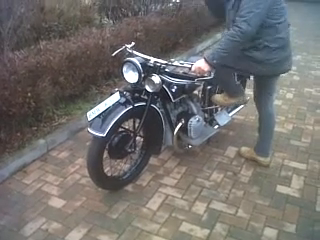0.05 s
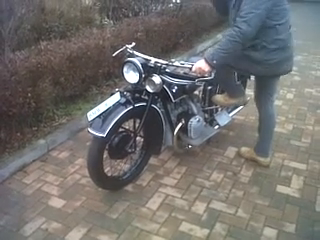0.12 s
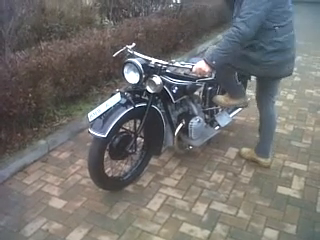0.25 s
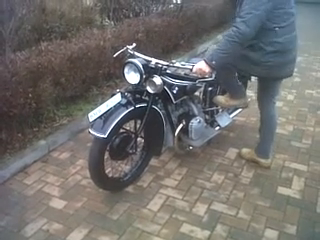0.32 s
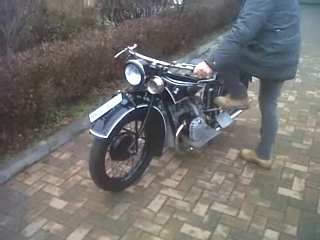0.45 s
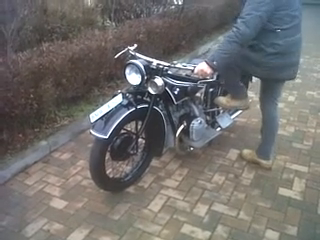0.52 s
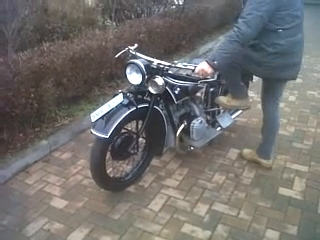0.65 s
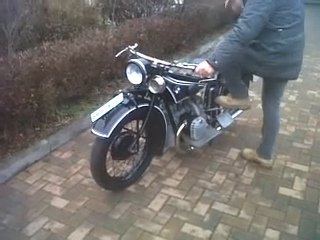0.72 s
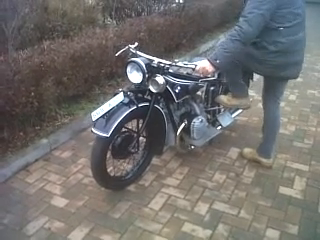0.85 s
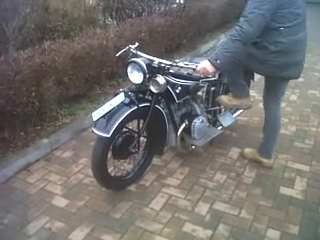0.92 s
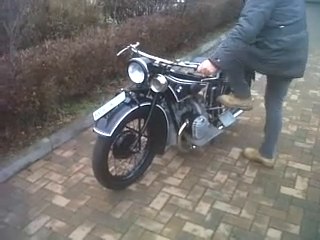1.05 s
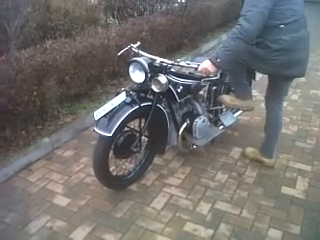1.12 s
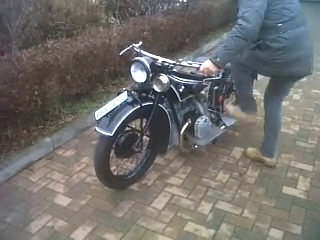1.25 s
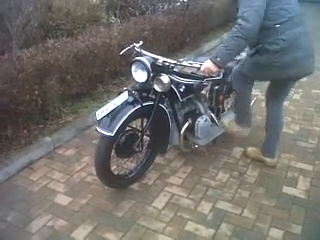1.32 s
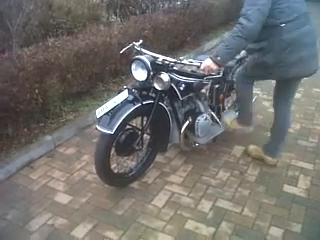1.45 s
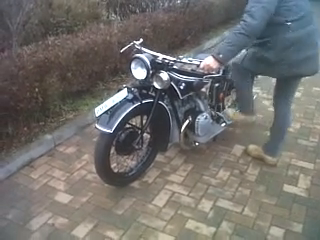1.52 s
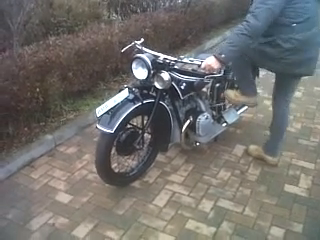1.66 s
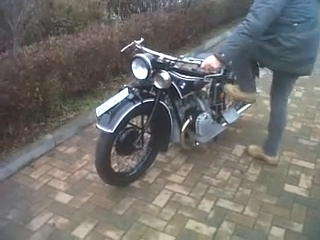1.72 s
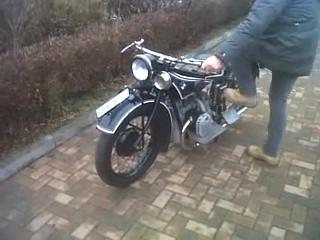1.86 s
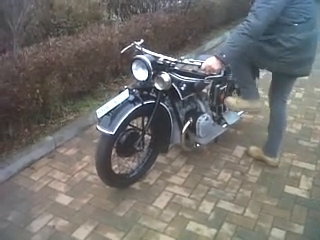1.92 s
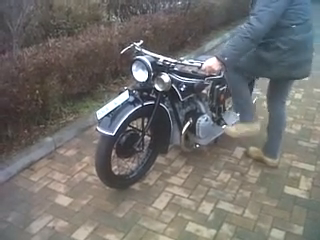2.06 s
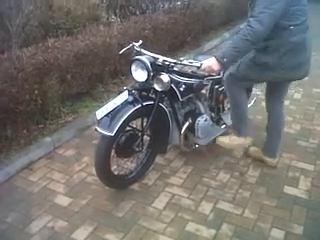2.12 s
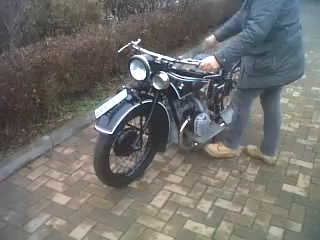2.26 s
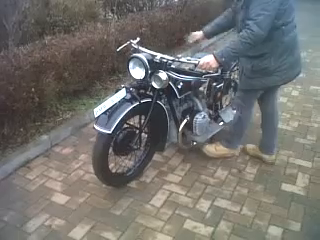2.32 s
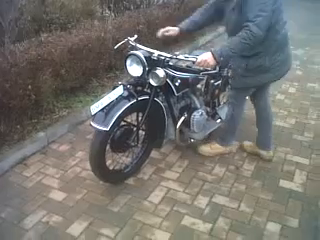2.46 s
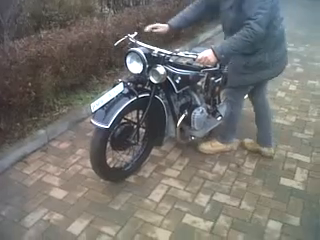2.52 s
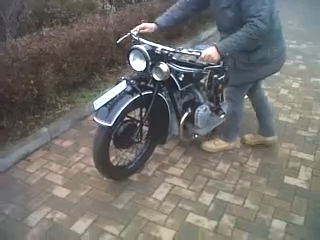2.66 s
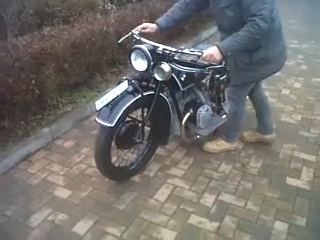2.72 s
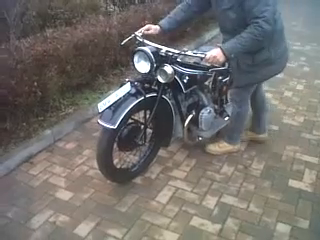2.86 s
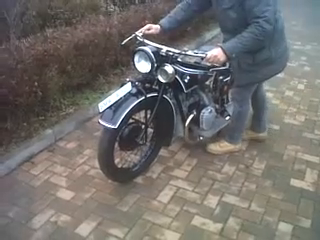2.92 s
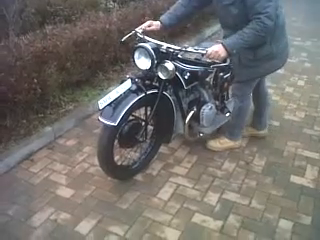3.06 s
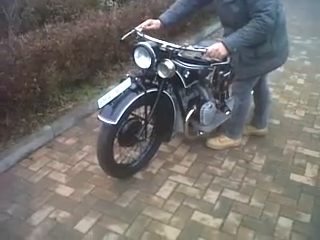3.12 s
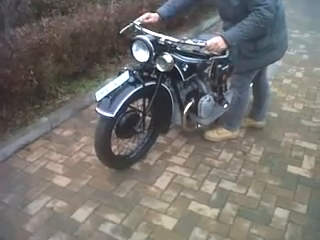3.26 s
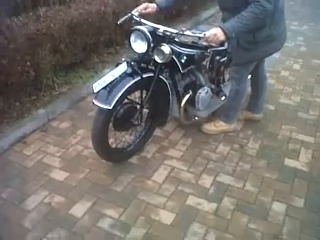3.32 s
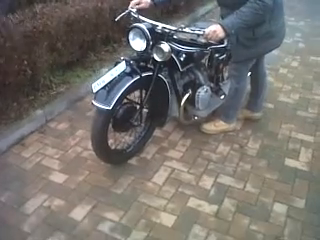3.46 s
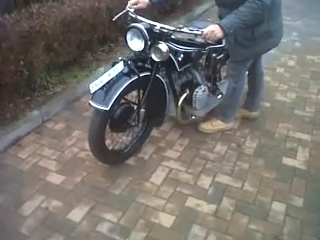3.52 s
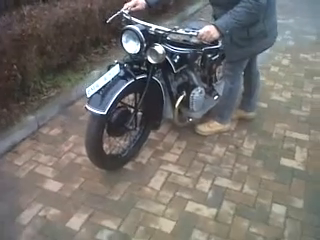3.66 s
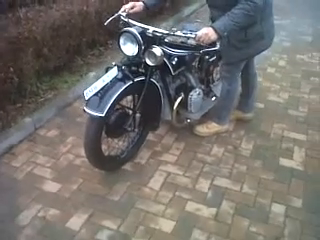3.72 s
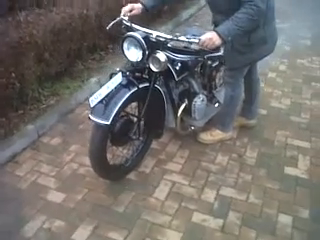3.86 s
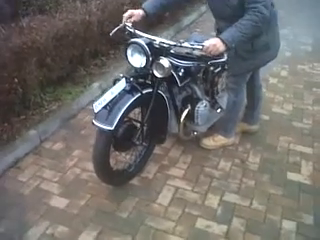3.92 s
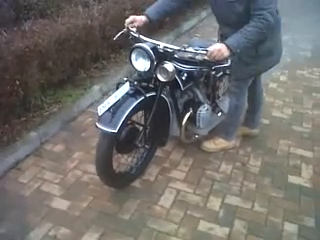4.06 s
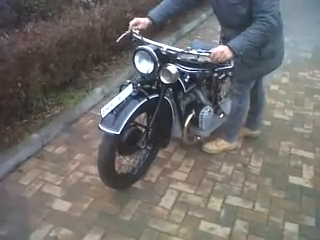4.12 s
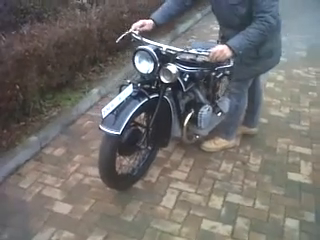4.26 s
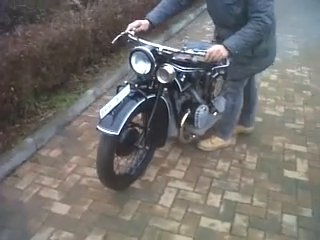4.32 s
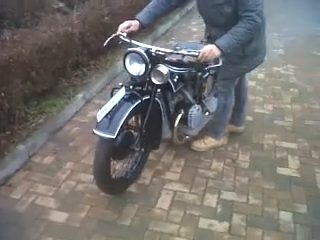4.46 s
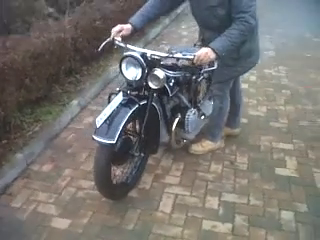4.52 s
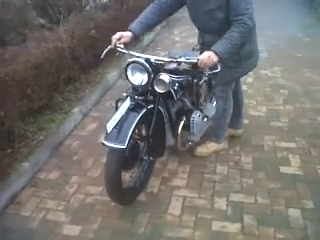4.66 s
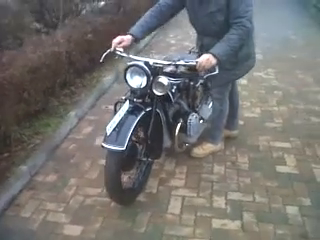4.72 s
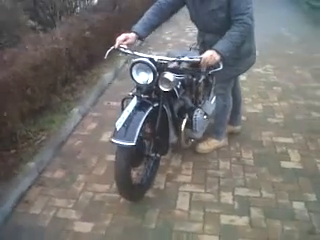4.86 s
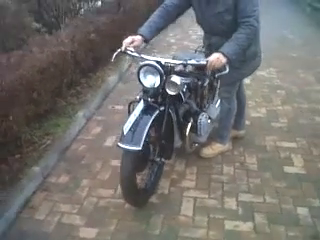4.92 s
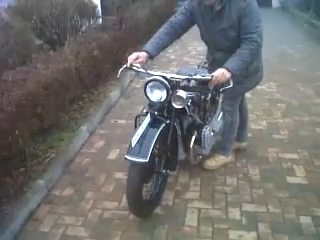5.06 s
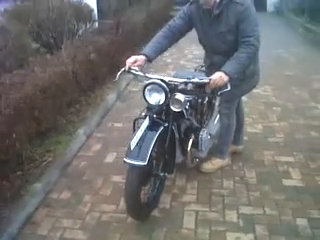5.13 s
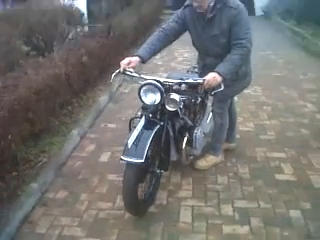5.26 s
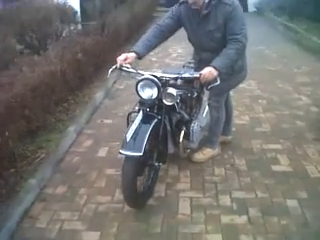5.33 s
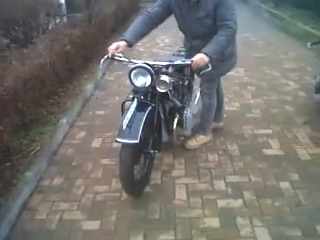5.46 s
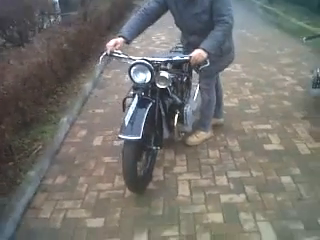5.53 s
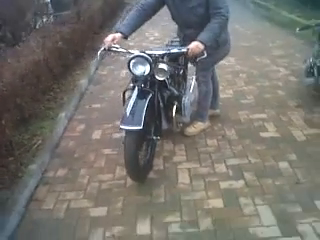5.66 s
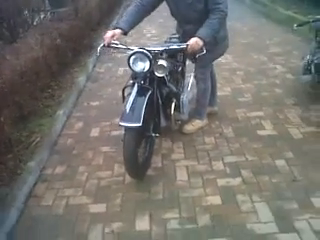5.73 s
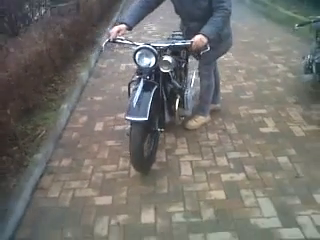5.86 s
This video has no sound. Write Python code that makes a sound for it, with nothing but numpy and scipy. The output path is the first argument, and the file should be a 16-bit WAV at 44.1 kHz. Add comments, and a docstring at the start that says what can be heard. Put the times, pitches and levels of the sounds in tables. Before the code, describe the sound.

Near-silence with faint far traffic on a paved drive, then a metallic kick-lever knock and a short ratchet whirr. An old two-cylinder motorcycle catches with slow, hollow chuffs and tappet clatter, gathers speed, then opens up into a loud, rough, rasping roar with skipped strokes. It eases slightly and keeps running fast and uneven, a little farther away. Close small microphone, thin bass, dull top, slight yard echoes.

```python
"""Paved drive: an old two-cylinder motorcycle is kick-started near a small microphone.
A ratchet whirrs, one cylinder catches, the other joins; the throttle opens once and the engine misses strokes.
Exhaust: a pressure pulse a turn with pipe echoes, silencer boom and gas noise. Gear: dense contacts and
valve knocks through case resonances. Intake: gulps of noise. Also short ringing knocks, a thin tone, a jingle.
Yard echoes follow all of it; far traffic and air lie under it."""
import sys
import numpy as np
from scipy import signal
from scipy.fft import rfft, irfft, next_fast_len
from scipy.io import wavfile
from scipy.ndimage import uniform_filter1d

SR = 44100
rng = np.random.default_rng(int(sys.argv[2]) if len(sys.argv) > 2 else 0)


def store_pcm(level_fs):
    """Save levels as 16-bit WAV."""
    pcm = np.round(np.clip(level_fs, -1, 1) * 32767).astype(np.int16)
    wavfile.write(sys.argv[1], SR, np.atleast_2d(pcm).T)


def boost_factor(decibels):
    """Convert a level in decibels to a linear amplitude factor."""
    exponent = np.asarray(decibels, float) / 20
    return 10 ** exponent


N = 259749
T = np.arange(N) / SR

# crank speed, one exhaust stroke a turn: (time [s], speed [turns/s])
CRANK_SPEED = [(1.48, 10.2), (1.79, 11.67), (2.124, 13.18), (2.44, 16.57), (2.67, 17.37), (2.91, 22.33),
               (3.235, 26.94), (3.41, 31.56), (3.688, 37.3), (3.82, 36.87), (4.01, 42.38), (4.18, 41.7),
               (4.442, 34.59), (4.56, 38.51), (4.792, 41.79), (4.986, 36.36), (5.221, 41.41), (5.34, 41.79),
               (5.52, 41.21), (5.66, 39.09), (5.79, 36.66), (5.89, 36.51)]
# regular firing: (first [s], last [s], spacing [turns], first level [dB], last level [dB])
STRONG_FIRINGS = [(1.486, 1.486, 2, -26.5, -26.5), (1.673, 2.163, 2, -28, -25.5),
                  (2.302, 2.774, 2, -22.5, -20), (2.87, 3.048, 2, -17, -17), (3.126, 3.533, 2, -13.5, -9.5),
                  (3.59, 3.807, 2, -13, -13), (3.862, 4.153, 2, -9.5, -10), (4.468, 4.774, 2, -12, -11.5),
                  (4.977, 5.475, 2, -13.5, -14.5), (5.571, 5.888, 4, -12.5, -12.5)]
WEAK_FIRINGS = [(2.235, 2.235, 4, -29.5, -29.5), (2.825, 3.086, 6, -25, -18), (3.311, 3.441, 4, -18, -19),
                (3.619, 3.673, 2, -18, -11), (3.835, 4.034, 4, -10.5, -12), (4.438, 4.75, 4, -13, -13),
                (5.005, 5.307, 4, -16, -12.5), (5.451, 5.451, 4, -12, -12), (5.648, 5.648, 4, -13, -13),
                (5.861, 5.861, 4, -17, -17)]
# pulse running to and fro in pipe and silencer:
# (delay when warm [ms], height when cold [ratio], height when warm [ratio], height after a miss [ratio])
PIPE_ECHOES = [(6.68, 1.47, 0.53, .15), (10.91, 0.79, 0.39, .05), (13.03, 0.66, .0, 0.25),
               (15.49, 0.32, 0.37, 0.0042), (20.22, 0.33, 0.25, 0.17), (25.6, .2, 0.16, 0.059)]
# silencer resonances: (frequency [Hz], width [Hz], level [dB])
SILENCER_MODES = [(118, 184, -10), (195.4, 17, 11.5), (240.6, 49, -5), (285, 26, -13.5), (684, 120, -15.5)]
# header pipe resonances: (frequency [Hz], width [Hz], level [dB])
HEADER_MODES = [(400, 97, -0.5), (667, 170, -2.5)]
# crankcase and cover resonances: (frequency [Hz], width [Hz], level [dB])
CASE_MODES = [(627, 136, 4), (967, 122, 12.5), (1135, 94, 9.5), (1287, 131, 4), (1644, 266, 4),
              (1823, 163, 2), (2210, 200, -10.5), (2554, 110, -8), (3885, 120, -21.5), (4400, 95, -23),
              (5410, 590, -29.5), (6360, 42, -38.5)]
# gear clatter spectrum: (frequency [Hz], density [dB per Hz])
CLATTER_SPECTRUM = [(210, -16), (350, 15.5), (560, 4), (819, -26), (1000, 8.5), (1210, -10.5), (1650, -24),
                    (2470, -24.5), (3030, -43), (5430, -50), (7270, -48.5), (9450, -96.5), (16000, -120)]
# intake roar spectrum: (frequency [Hz], density [dB per Hz])
INTAKE_SPECTRUM = [(710, -28.5), (1200, -15), (1300, 1.5), (1520, -10), (1710, 4), (1960, -2), (2210, -3),
                   (2590, -9.5), (3300, -12.5), (3830, -12), (4150, -15), (4430, -13.5), (4650, -19.5),
                   (5500, -25), (5900, -31), (7270, -53.5), (9450, -71.5), (16000, -120)]
# frame shudder spectrum: (frequency [Hz], density [dB per Hz])
FRAME_SPECTRUM = [(25, -9), (60, -9.5), (110, -3.5), (190, 8.5), (300, -4), (450, -29), (800, -55)]
# gear level laws: (full speed, throttle shut [dB], speed slope [dB/octave], added at open throttle [dB],
# added when every turn fires [dB], slope as the listener steps away [dB/s])
CLATTER_LAW = (-29.5, 9.5, 1, 1.5, -2.5)
INTAKE_LAW = (-48.5, 6, 17, 4, -1.9)
# valve gear over two turns: (turns after the strong stroke [turns], relative level [dB], tilt [dB/octave])
VALVE_HITS = [(.0, 3, 7), (.49, 5, 5), (.75, 2, -3.5), (1.33, 0, -2), (1.5, 8.5, 6), (1.57, 5, 1)]
# ratchet slipping as the lever swings down and back: (full from [s], to [s], level [dB], swell [dB/s])
RATCHET_SLIPS = [(1.423, 1.48, -51, 328), (1.501, 1.51, -38.5, 597), (1.655, 1.891, -34, 152)]
# ratchet resonances: (frequency [Hz], width [Hz], level [dB])
RATCHET_MODES = [(788, 158, -2.5), (947, 78, 7.5), (1030, 66, 7), (1143, 26, 9.5), (1590, 210, -5.5),
                 (1860, 100, -3.5), (2320, 1000, -24), (2900, 410, -17), (3640, 190, -21), (4470, 110, -28),
                 (5830, 190, -41)]
# knocks of lever, stop and loose parts: (time [s], relative level [dB], tilt [dB/octave])
LEVER_KNOCKS = [(1.411, -37, 0.5), (1.479, -26.5, -0.5), (1.503, -20.5, 2.5), (1.512, -27, 0.5)]
# short ringing knocks (lever thuds, valve clacks, loose parts, one faint early hoot):
# (time [s], relative level [dB], pitch [Hz], t60 [s])
RINGING_KNOCKS = [(0.634, -54, 470, 0.21), (1.44, -44, 1030, 0.074), (1.441, -38, 1790, 0.05),
                  (1.477, -22, 710, 0.063), (1.483, -25, 400, 0.1), (1.503, -29, 460, 0.069),
                  (1.834, -27.5, 1000, .07), (1.855, -29.5, 976, 0.08), (1.974, -23, 1840, 0.028),
                  (1.975, -26.5, 1710, 0.036), (2.126, -26.5, 993, .052), (2.128, -33.5, 1630, .05),
                  (2.274, -34, 1740, 0.051), (2.401, -22, 1726, 0.034), (2.524, -27, 964, 0.068),
                  (3.025, -20.5, 996, 0.072), (3.287, -12.5, 981, 0.084), (3.815, -10.5, 952, 0.04),
                  (4.017, -8.5, 994, 0.088), (4.529, -15, 1013, 0.076), (4.632, -13, 964, 0.096),
                  (4.689, -23, 1100, 0.099), (4.716, -16.5, 975, 0.087), (4.77, -15.5, 975, 0.075)]
# partials of a ringing knock: (multiple of pitch [ratio], level [dB])
RINGING_PARTIALS = [(1.0, -0.5), (1.09, -13), (.8, -8)]
# loose plate, one row: (start pitch [Hz], end pitch [Hz], level [dB])
PLATE_TONE = (415, 425, -40)
# small loose part, resonances: (frequency [Hz], width [Hz], level [dB])
JINGLE_MODES = [(4860, 120, -6), (5260, 90, 2), (5650, 110, 1.5), (5900, 40, 4), (6130, 90, -6),
                (6400, 150, -10)]
# small loose part, level curve: (time [s], level [dB])
JINGLE_LEVEL = [(4.7, -76), (4.9, -67), (5.08, -59.5), (5.2, -54.5), (5.32, -64), (5.45, -62.5), (5.6, -73),
                (5.89, -76)]
# paving, hedge and wall echoes: (delay [ms], level [dB])
YARD_ECHOES = [(6.1, -19), (17.0, -35.5), (31.0, -38.5), (47.0, -24)]
# far traffic and air spectrum: (frequency [Hz], density [dB per Hz])
AIR_SPECTRUM = [(12, -58), (20, -20), (76, -1.5), (124, -7), (167, -17), (208, -12), (448, -16.5),
                (482, -17), (532, -18), (1090, -17.5), (1610, -26.5), (7270, -44.5), (9450, -85),
                (16000, -120)]

FULL_SPEED_PER_S = 40
STEP_AWAY_S = 4.5   # the listener steps away from here on
OPEN_S, OPENING_S = 3.465, 0.055   # throttle snaps open
SHUT_S, SHUTTING_S = 4.326, 0.35   # and closes slowly
CROWDED_LOSS_DB, FIRING_SPREAD_DB = 2.5, 1.0   # loss on the turn after a weak firing; chance of each stroke
WARM_FROM_S, WARM_BY_S = 1.85, 3.5   # pipe gas heats up, fast at first
COLD_STRETCH = 1.698   # echo delays, cold over warm
PULSE_WARM_MS, PULSE_SKEW, ECHO_SPREAD = 1.078, .35, .06
PUFF_DB, PUFF_DB_PER_OCTAVE = -24.5, 11   # unfired stroke at full speed; slope with speed
PUFF_LATE_MS, PUFF_WIDENING = 4.0, .05
PUFF_OPEN_DB, PUFF_AWAY_DB_PER_S = 1, -2   # fuller at open throttle, fainter with distance
COAST_GAIN_DB, COAST_TURNS, COAST_FADE_DB = 17, 2.36, 1.1   # puffs swell over misses, less a fade per turn
SLUG_COLD, SLUG_WARM, SLUG_MISS, SLUG_WARM_MS = 0.54, -0.27, -0.16, 2.75   # push while cold, suction when hot
BOOM_DB, BOOM_MS = -15.5, 24.4   # relative to the firing
SPIT_DB, SPIT_COLD_DB, SPIT_MS = -13, -5.5, 8.7   # relative to the firing; cold gas tears less
RING_COLD_DB, RING_WARM_DB = -2.5, -6.5
LOAD_S = 0.086   # averaging time of the firings that load the gear
COVER_BAND_HZ, COVER_DB_PER_OCTAVE = (1400, 3600), 5.5   # covers ring up with speed
VALVE_OPEN_DB = 4.5   # tappets hit harder at open throttle
SHUDDER_DB, SHUDDER_DB_PER_OCTAVE = -4, -1.8   # over the clatter at full speed; stands out at low speed
SNAP_DB, SNAP_TURN = 4, 1.52   # inrush snaps once in two turns, as an inlet valve shuts
RATCHET_STOP_DB_PER_S = 354.5
RINGING_RISE_S, CONTACT_DB = .0007, -3.5   # rise of the ring; relative level of the contact
PLATE_FROM_S, PLATE_TO_S = 2.85, 3.52
AIR_DB = -63
MIC_LOW_HZ, MIC_TOP_HZ, MIC_LIMIT = 50.6, 7744, .62


def rms_one(x):
    """Scale to unit power."""
    return x / np.sqrt(np.mean(x ** 2) + 1e-20)


def in_time(rows):
    """Each column of a table as a curve over all samples."""
    s, *columns = np.transpose(rows)
    return [np.interp(T, s, c) for c in columns]


def ramp(from_s, length_s):
    """Straight rise from 0 to 1."""
    return np.clip((T - from_s) / length_s, 0, 1)


def drift(rate_hz):
    """Slow chance with spread about 1: straight lines between random points."""
    steps = rng.standard_normal(int(N * rate_hz / SR) + 2)
    return np.interp(T * rate_hz, np.arange(len(steps)), steps) * np.sqrt(3 / 2)


def grains(per_s, spread_db):
    """Random clicks of uneven size and sign; unit power."""
    sizes = boost_factor(spread_db * np.minimum(rng.exponential(1, N), 4)) * rng.choice([-1, 1], N)
    return rms_one(sizes * (rng.random(N) < per_s / SR))


def burst(level_db, at_s, decay_ms):
    """Envelope that rises fast at each time and dies away."""
    kicks = np.zeros(N)
    np.add.at(kicks, np.clip((at_s * SR).astype(int), 0, N - 1), boost_factor(level_db))
    fall, rise = np.exp(-1000 / (np.array([decay_ms, decay_ms / 5]) * SR))
    return signal.lfilter([1 - rise], np.convolve([1, -fall], [1, -rise]), kicks + 1e-18)


def coloured(x, spectrum):
    """Weight x by a spectrum in the frequency domain; unit power."""
    hz, db = np.transpose(spectrum)
    size = next_fast_len(N)
    log_hz = np.log(np.arange(size // 2 + 1) * SR / size + 1)
    gain = boost_factor(np.interp(log_hz, np.log(hz), db))
    return rms_one(irfft(rfft(x, size) * gain, size)[:N])


def resonances(x, modes):
    """Parallel two-pole resonators with alternating signs."""
    out = 0
    for k, (hz, width_hz, db) in enumerate(modes):
        r = np.exp(-np.pi * width_hz / SR)
        a = [1, -2 * r * np.cos(2 * np.pi * hz / SR), r * r]
        b = [(1 - r * r) / 2, 0, (r * r - 1) / 2]
        out = out + (-1) ** k * boost_factor(db) * signal.lfilter(b, a, x + 1e-18)
    return out


def knock(at_s, level_db, tilt_db, decay_ms):
    """Short steel contacts into the crankcase; its resonances are tilted about 1 kHz."""
    tilted = [(hz, width_hz, db + tilt_db * np.log2(hz / 1000)) for hz, width_hz, db in CASE_MODES]
    return resonances(burst(level_db, at_s, decay_ms) * rng.standard_normal(N), tilted)


def crank():
    """Turns since the first stroke, and the level in dB of each turn's firing (nan where it misses)."""
    turns = np.cumsum(in_time(CRANK_SPEED)[0]) / SR
    turns = turns - np.interp(STRONG_FIRINGS[0][0], T, turns)
    strong, weak = np.full((2, int(turns[-1]) + 1), np.nan)
    for level_db, runs in ((strong, STRONG_FIRINGS), (weak, WEAK_FIRINGS)):
        for first_s, last_s, every, first_db, last_db in runs:
            first, last = np.round(np.interp([first_s, last_s], T, turns)).astype(int)
            picked = np.arange(first, last + 1, round(every))
            level_db[picked] = np.linspace(first_db, last_db, len(picked))
    strong[1:] -= CROWDED_LOSS_DB * np.isfinite(weak[:-1])
    return turns, np.fmax(strong, weak)


def speed_octaves():
    """Crank speed in octaves re full speed."""
    return np.log2(in_time(CRANK_SPEED)[0] / FULL_SPEED_PER_S)


def throttle():
    """Throttle opening, 0 to 1."""
    return ramp(OPEN_S, OPENING_S) - ramp(SHUT_S, SHUTTING_S)


def puff_levels(at_s, fired):
    """Unfired stroke levels in dB: speed, misses in a row, throttle and distance set them."""
    count = np.arange(len(fired))
    missed = count - np.maximum.accumulate(count * fired)
    speed = np.interp(at_s, *np.transpose(CRANK_SPEED))
    db = PUFF_DB + PUFF_DB_PER_OCTAVE * np.log2(speed / FULL_SPEED_PER_S)
    db += COAST_GAIN_DB * (1 - np.exp(-missed / COAST_TURNS)) - COAST_FADE_DB * missed
    db += PUFF_OPEN_DB * np.interp(at_s, T, throttle())
    return db + PUFF_AWAY_DB_PER_S * np.maximum(at_s - STEP_AWAY_S, 0)


def stroke_pulse(span, fired, heat, echo_chance):
    """Dip, bang, dip radiated by the open end, with pipe echoes (later in cold gas) and a slow gas slug."""
    delay_ms, cold, warm, after_miss = np.transpose(PIPE_ECHOES)
    stretch = COLD_STRETCH + heat * (1 - COLD_STRETCH)
    heights = cold + heat ** 1.3 * (warm - cold) if fired else after_miss
    heights = heights + ECHO_SPREAD * echo_chance
    soft = 0 if fired else 1   # unburnt charge leaves later and more gently
    ms = span * 1000 / SR - np.append(0, delay_ms * stretch)[:, None] - soft * PUFF_LATE_MS
    u = ms / (PULSE_WARM_MS * stretch ** 0.81 * (1 + PUFF_WIDENING * soft))
    shape = (1 - u * u + PULSE_SKEW * (1 - 2 * soft) * u) * np.exp(-u * u / 2)
    front = (ms + 0.97) / 0.5
    shape += fired * heat * 0.22 * front * np.exp(-front ** 2 / 2)   # hot gas steepens the rising edge
    push = SLUG_COLD + min(2 * heat, 1) * (SLUG_WARM - SLUG_COLD) if fired else SLUG_MISS
    slug = (ms[0] / (SLUG_WARM_MS * stretch) - 1) ** 2
    return np.append(1, heights) @ shape + push * (1 - slug) * np.exp(-slug / 2)


def exhaust(turns, fired_db):
    """A pressure pulse a turn rings the silencer; firings add its random boom and gas tearing past the valve."""
    warmth = 1 - (1 - ramp(WARM_FROM_S, WARM_BY_S - WARM_FROM_S)) ** 1.5
    count = np.arange(len(fired_db))
    at_s = np.interp(count, turns, T)
    fired = np.isfinite(fired_db)
    chance = rng.standard_normal((len(count), len(PIPE_ECHOES) + 1))
    level_db = np.where(fired, fired_db, puff_levels(at_s, fired)) + FIRING_SPREAD_DB * chance[:, 0]
    out, span = np.zeros(N + 4000), np.arange(-400, 3000)
    for k in count:
        heat = np.clip(np.interp(at_s[k], T, warmth), 0, 1)
        pulse = stroke_pulse(span, fired[k], heat, chance[k, 1:])
        out[round(at_s[k] * SR) + span] += boost_factor(level_db[k]) * pulse
    pulses = out[:N]
    ring_gain = boost_factor(RING_COLD_DB + warmth * (RING_WARM_DB - RING_COLD_DB))
    ring = ring_gain * resonances(pulses, SILENCER_MODES)
    boom = rms_one(resonances(rng.standard_normal(N), SILENCER_MODES))
    boom = boom * burst(level_db[fired] + BOOM_DB, at_s[fired] + 0.00088, BOOM_MS)
    # the header pipe barks as the valve opens
    spit = rms_one(resonances(rng.standard_normal(N), HEADER_MODES))
    spit = spit * burst(level_db[fired] + SPIT_DB, at_s[fired] - .002, SPIT_MS)
    return pulses + ring + boom + boost_factor(SPIT_COLD_DB * (1 - warmth)) * spit


def gear_levels(turns, fired_db):
    """Clatter and intake levels in dB follow speed, throttle, load and distance."""
    firing = np.isfinite(fired_db)[np.clip(turns, 0, None).astype(int)]
    load = uniform_filter1d(firing * 1., size=int(LOAD_S * SR))
    away_s = np.maximum(T - STEP_AWAY_S, 0)
    causes = [np.ones(N), speed_octaves(), throttle(), load, away_s]
    return [np.array(law) @ causes for law in (CLATTER_LAW, INTAKE_LAW)]


def valve_beat(turns):
    """Tappets knock the case, each once in two turns; they stand out most at low speed."""
    pairs = np.arange(0, turns[-1], 2)
    chance = rng.standard_normal((len(pairs), len(VALVE_HITS)))
    out = 0
    for k, (turn, db, tilt_db) in enumerate(VALVE_HITS):
        at_s = np.interp(pairs + turn + 0.0046 * chance[:, k - 1], turns, T)
        out = out + knock(at_s, db + 2.0 * chance[:, k] + 13.0, tilt_db, 2.85)
    return out * np.clip(8.5 / in_time(CRANK_SPEED)[0], 0, 1) ** 1.14


def gear_clatter(turns):
    """Dense metal contacts, swelling with the turns, ring case and covers; valve hits are added."""
    swell_db = 0.58 * np.cos(2 * np.pi * (turns - .5)) + 0.56 * np.cos(np.pi * (turns - .2))
    contacts = grains(4000, 2.04) * boost_factor(2.0 * drift(40) + swell_db)
    rung = rms_one(resonances(contacts, CASE_MODES))
    clatter = rms_one(rung + boost_factor(-8.5) * coloured(contacts, CLATTER_SPECTRUM))
    covers = signal.sosfilt(signal.butter(2, COVER_BAND_HZ, "band", fs=SR, output="sos"), clatter)
    cover_gain = boost_factor(COVER_DB_PER_OCTAVE * speed_octaves())
    return clatter + (cover_gain - 1) * covers + boost_factor(VALVE_OPEN_DB * throttle()) * valve_beat(turns)


def frame_shudder():
    """Low noise of the shaking frame, of wavering level."""
    level_db = SHUDDER_DB + SHUDDER_DB_PER_OCTAVE * speed_octaves() + 2.0 * drift(30)
    return boost_factor(level_db) * coloured(rng.standard_normal(N), FRAME_SPECTRUM)


def intake_roar(turns):
    """Air rushes into the carburettor in gulps, partly through the case resonances."""
    snap_db = SNAP_DB * np.exp(-3.0 * ((turns - SNAP_TURN) % 2))
    gulp_db = 2.0 * np.cos(2 * np.pi * (turns - .45)) + 1.2 * drift(60) + snap_db
    rush = grains(4500, 3.0) * boost_factor(gulp_db)
    level_modes = [(hz, width_hz, 0) for hz, width_hz, db in CASE_MODES]
    return coloured(rush + boost_factor(-9.0) * resonances(rush, level_modes), INTAKE_SPECTRUM)


def running_gear(turns, fired_db):
    """Clatter, shudder and intake roar at their running levels, from the first stroke on."""
    clatter_db, intake_db = gear_levels(turns, fired_db)
    mechanical = boost_factor(clatter_db) * (gear_clatter(turns) + frame_shudder())
    return ramp(STRONG_FIRINGS[0][0], 0.012) * (mechanical + boost_factor(intake_db) * intake_roar(turns))


def starter_lever():
    """Ratchet teeth slip in a steady whirr of ringing grains; single knocks hit the case."""
    slip = 0
    for full_s, stop_s, db, swell in RATCHET_SLIPS:
        before_db = swell * np.maximum(full_s - T, 0)
        after_db = RATCHET_STOP_DB_PER_S * np.maximum(T - stop_s, 0)
        slip = slip + boost_factor(db - before_db - after_db)
    grind = resonances(grains(5000, 1.0), RATCHET_MODES)
    even = grind / uniform_filter1d(grind ** 2 + 1e-20, size=400) ** .3   # teeth alike in force
    knocks = sum(knock(np.array([s]), db + 6.5, tilt_db, 3.9) for s, db, tilt_db in LEVER_KNOCKS)
    return slip * rms_one(even) + knocks


def ringing_knocks():
    """Short ringing knocks: a few decaying partials start at once, with a noise contact in the case."""
    out = np.zeros(N)
    all_phases = rng.uniform(0, 2 * np.pi, (len(RINGING_KNOCKS), len(RINGING_PARTIALS)))
    for (s, db, hz, t60_s), phases in zip(RINGING_KNOCKS, all_phases):
        since = np.clip(T - s, 0, 1)
        fade = (1 - np.exp(-since / RINGING_RISE_S)) * boost_factor(db - 5.5 - 60 * since / t60_s)
        out += fade * sum(boost_factor(part_db) * np.sin(2 * np.pi * hz * part * since + phase)
                          for (part, part_db), phase in zip(RINGING_PARTIALS, phases))
    s, db = np.transpose(RINGING_KNOCKS)[:2]
    return out + knock(s, db + CONTACT_DB, 2.2, 1.8)


def loose_plate():
    """A thin sine that wavers in pitch and level and fades in and out."""
    first_hz, last_hz, db = PLATE_TONE
    hz = np.interp(T, (PLATE_FROM_S, PLATE_TO_S), [first_hz, last_hz]) + 4.0 * drift(30)
    on = ramp(PLATE_FROM_S, 0.035) - ramp(PLATE_TO_S - .2, 0.25)
    return np.sqrt(2) * on * boost_factor(db + 2.0 * drift(28.0)) * np.sin(2 * np.pi * np.cumsum(hz) / SR)


def jingle(turns):
    """Uneven small contacts, thickest once in two turns, ring thin high modes."""
    shaken = grains(500, 5.1) * boost_factor(4.6 * np.cos(np.pi * (turns - 1.5)) + 2.6 * drift(24))
    level = boost_factor(in_time(JINGLE_LEVEL)[0]) * ramp(JINGLE_LEVEL[0][0], .05)
    return level * rms_one(resonances(shaken, JINGLE_MODES))


def yard(x):
    """Add a few dull echoes off the paving and its borders."""
    dull = signal.sosfilt(signal.butter(1, 2500, fs=SR, output="sos"), x)
    return x + sum(boost_factor(db) * np.interp(T - ms / 1000, T, dull, left=0) for ms, db in YARD_ECHOES)


def far_air():
    """Far traffic and air: coloured noise of slowly drifting level."""
    return boost_factor(AIR_DB + 0.84 * drift(3.3)) * coloured(rng.standard_normal(N), AIR_SPECTRUM)


def scene():
    """Engine, starter, knocks and loose parts in the yard, over far traffic."""
    turns, fired_db = crank()
    engine = exhaust(turns, fired_db) + running_gear(turns, fired_db)
    near = engine + starter_lever() + ringing_knocks() + loose_plate() + jingle(turns)
    return (yard(near) + far_air())[None]


def low_pass(x):
    """Removes everything above the highest recorded frequency."""
    return signal.sosfilt(signal.butter(12, 7420, fs=SR, output="sos"), x)


def record(dry):
    """A small microphone: little bass, rounded peaks, steep top cut."""
    x = signal.sosfilt(signal.butter(2, MIC_LOW_HZ, "high", fs=SR, output="sos"), dry)
    x = MIC_LIMIT * np.tanh(x / MIC_LIMIT)
    x = signal.sosfilt(signal.cheby2(14, 60, MIC_TOP_HZ, fs=SR, output="sos"), x)
    return low_pass(x)


dry = scene()
out = record(dry)
store_pcm(out)
```